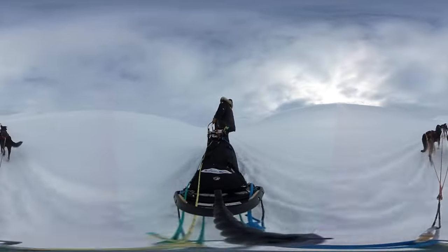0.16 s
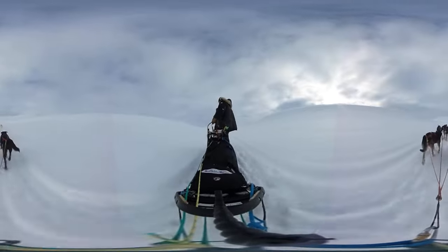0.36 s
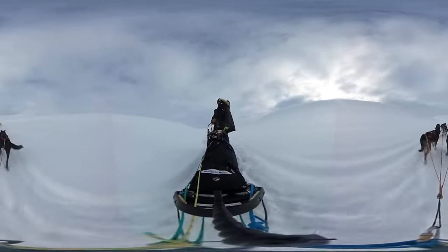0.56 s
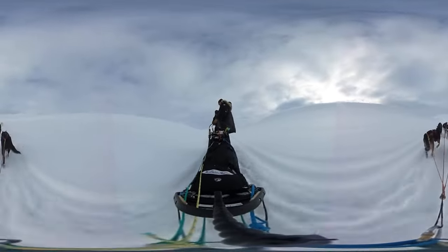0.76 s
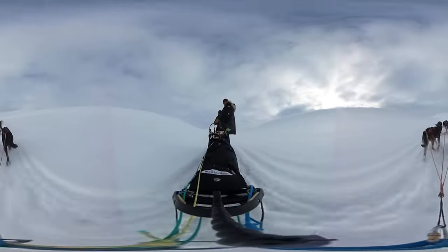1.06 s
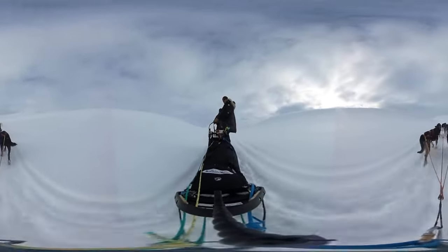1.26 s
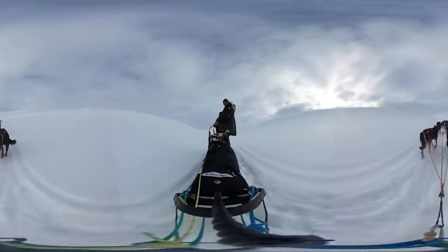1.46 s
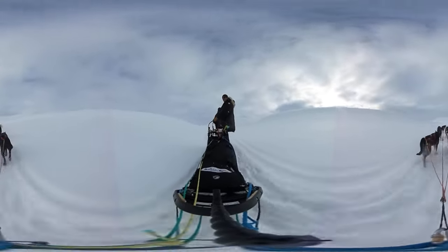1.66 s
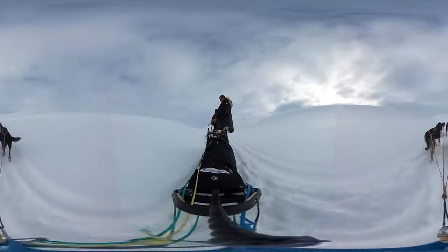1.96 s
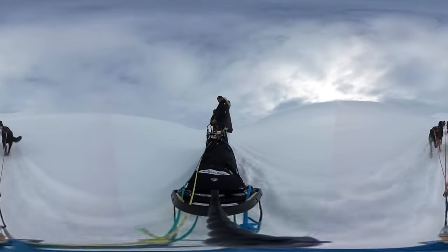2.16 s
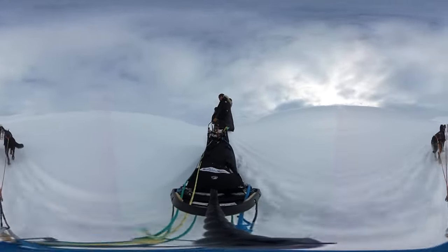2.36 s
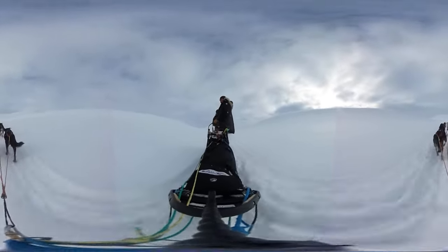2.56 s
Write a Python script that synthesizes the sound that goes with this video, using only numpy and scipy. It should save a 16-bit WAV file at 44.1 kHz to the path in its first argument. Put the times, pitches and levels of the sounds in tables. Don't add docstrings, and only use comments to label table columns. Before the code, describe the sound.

A sled jolts and crunches over crusted snow, its frame knocking amid icy snaps and faint wind.

```python
import sys
import numpy as np
from scipy import signal
from scipy.fft import rfft, irfft
from scipy.io import wavfile
from scipy.ndimage import uniform_filter1d

SR = 44100
rng = np.random.default_rng(int(sys.argv[2]) if len(sys.argv) > 2 else 0)


def to_linear_factor(level_db):
    exponent = np.asarray(level_db, float) / 20
    return 10 ** exponent


def materialize(psi):
    bounded = np.clip(np.atleast_2d(psi).T, -1, 1)
    quanta = np.round(bounded * 32767).astype(np.int16)
    wavfile.write(sys.argv[1], SR, quanta)


N = 120393
T = np.arange(N) / SR


def rms_one(x):
    return x / np.sqrt(np.mean(x ** 2) + 1e-20)


def curve(rows, axis=1):
    rows = np.array(rows)
    return np.interp(T, rows[:, 0], rows[:, axis])


def drift(rate_hz):
    r = np.exp(-16 * np.pi * rate_hz / SR)
    noise = rng.standard_normal(N // 8 + 3002)
    slow = signal.lfilter([1], [1, -2 * r, r * r], noise)[3000:]
    return np.interp(np.arange(N) / 8, np.arange(len(slow)), rms_one(slow))


def resonate(x, hz, width_hz):
    r = np.exp(-np.pi * width_hz / SR)
    feedback = [1, -2 * r * np.cos(2 * np.pi * hz / SR), r * r]
    return signal.lfilter([(1 - r * r) / 2, 0, (r * r - 1) / 2], feedback, x)


def ring(clicks, modes):
    out = 0
    for hz, db, t60 in modes:
        r = to_linear_factor(-60 / (t60 * SR))
        w = 2 * np.pi * hz / SR
        hits = clicks * to_linear_factor(2.5 * drift(150)) + 1e-18
        out = out + signal.lfilter([0, to_linear_factor(db) * np.sin(w)], [1, -2 * r * np.cos(w), r * r], hits)
    return signal.sosfilt(signal.butter(4, 1800, "high", fs=SR, output="sos"), out)


def banded(spectrum, patchy_db, rate_hz, count):
    hz, db = np.transpose(spectrum)
    edges = np.geomspace(hz[0], hz[-1], count + 1)
    white = rng.standard_normal((2, N))
    shared = drift(rate_hz)
    out = 0
    for k, (low, high) in enumerate(zip(edges, edges[1:])):
        band = signal.sosfilt(signal.butter(2, [low, high], "band", fs=SR, output="sos"), white[k % 2])
        level_db = np.interp(np.log(low * high) / 2, np.log(hz), db)
        flicker_db = patchy_db * (0.12 * shared + 1.5 * drift(rate_hz / 2))
        out = out + band * to_linear_factor(level_db + flicker_db)
    return rms_one(out)


# start_s, level_db, graininess_db
RUNNER_LOAD = [(0, -28, 5), (.12, -20, 0), (.36, -17, 2), (.55, -20.5, -3), (.7, -18.5, 7), (.82, -26, 13),
               (.92, -15.5, -8), (1.08, -24, -1), (1.2, -20.5, 5.5), (1.6, -18.5, 1), (1.9, -17, -0.5),
               (2.2, -16.5, 5), (2.5, -16.5, 4), (2.73, -22, 8)]


def runner_load():
    load_db = curve(RUNNER_LOAD)
    return load_db, load_db + curve(RUNNER_LOAD, axis=2)


# pitch_hz, level_db (per Hz)
WIND_SPECTRUM = [(20, -9), (45, 2.5), (150, -6.5), (290, -7)]
# start_s, level_db
GUSTS = [
    (0.0, -29.5),
    (0.15, -29),
    (0.56, -32),
    (0.81, -34),
    (0.82, -36),
    (1.57, -32.5),
    (1.69, -41.5),
    (1.97, -30.5),
    (2.41, -28),
    (2.73, -29),
]


def wind():
    return to_linear_factor(curve(GUSTS) + 3.0) * banded(WIND_SPECTRUM, patchy_db=2.0, rate_hz=9.0, count=7)


# pitch_hz, level_db (per Hz)
HISS_SPECTRUM = [(2800, -10), (4000, -7.5), (6200, -14.5), (7700, -9), (8900, -21.5), (11300, -4.5),
                 (12400, -7)]


def runner_hiss(bright_load, crush, shake, grind, spray):
    rubbing = to_linear_factor(-35) * (bright_load + 0.5 * crush + 0.15 * shake)
    level = rubbing + to_linear_factor(-29) * grind + spray
    return level * banded(HISS_SPECTRUM, patchy_db=3.1, rate_hz=28, count=12)


# pitch_hz, level_db, fade_s (time to fall 60 dB)
KNOCK_TONES = [(2416, 9.5, 0.004), (2870, -16, 0.011)]
# pitch_hz, level_db, fade_s (time to fall 60 dB)
TICK_TONES = [(4970, -9, 0.0013), (6500, -14, 0.003), (7700, -6.5, 0.0029), (10560, -2, 0.0023),
              (11490, -4.5, 0.0042)]


def grains(bright_load_db):
    grains_per_s, spread_db, level_db = 200, 5.5, -27.5
    sizes = to_linear_factor(spread_db * np.minimum(rng.exponential(1, (2, N)), 3))
    sizes = sizes * rng.choice([-1, 1], (2, N))
    born = rng.random(N) < grains_per_s * to_linear_factor(5 * drift(20)) / SR
    ticks = ring(sizes[0] * born, TICK_TONES)
    knocks = ring(sizes[1] * born, KNOCK_TONES)
    return to_linear_factor(bright_load_db + level_db) * rms_one(ticks + 0.24 * knocks)


# pitch_hz, width_hz, level_db
FRAME_TONES = [(404, 103.8, 6), (684.6, 101, -3.5), (809, 142, -8), (917, 496, -7.5), (1334, 354, -13.5),
               (1490, 610, -19), (2252, 550, -17), (2660, 1530, -33.5)]


def frame(load, rattle, shake, grind):
    grit_db, grit_hz = 2.2, 60
    lumps_hz, lumpy_db = 26.6, 1.0
    white = rng.standard_normal((2, N)) * to_linear_factor(grit_db * drift(grit_hz))
    lumps = drift(lumps_hz)
    modes = []
    for k, (hz, width, db) in enumerate(FRAME_TONES):
        tone = rms_one(resonate(resonate(white[k % 2], hz, width), hz, 2 * width))
        level = to_linear_factor(db + lumpy_db * (lumps + drift(9.8)))
        modes.append(level * tone * np.sqrt(width / FRAME_TONES[0][1]))

    power = modes[0] ** 2
    lowest = modes[0] / np.sqrt(1 + uniform_filter1d(power, size=220) / np.mean(power))
    out = 0.89 * lowest * load ** 3 / (load + shake) ** 2
    for k, mode in enumerate(modes[1:]):
        out = out + mode * (0.85 * load + rattle + grind * to_linear_factor(1.5 * k))
    return out


# start_s, level_db (of the bright tick), knock_db (relative to the tick)
HARD_SNAPS = [(0.0687, -21, -19), (0.2128, -0.5, -5.5), (0.377, -11, 0.5), (0.5832, -13, -11),
              (0.6402, -6.5, 2.5), (0.7585, -7.5, -1.5), (0.852, -16, 1), (1.011, 2, -9),
              (1.2472, -13, -15), (1.3779, -28, 20), (1.4276, -16.5, 3), (1.5601, -12.5, -2),
              (1.6367, -5.5, -4.5), (1.6652, -9.5, 0.5), (1.734, -10.5, -6), (1.9763, -16.5, 0),
              (2.0097, -12.5, -4), (2.0697, -3.5, -2), (2.1347, -18, 2.5), (2.4242, -5, -6.5),
              (2.603, -47, -2), (2.618, -10, -1), (2.6771, -20, -3), (2.7177, -21.5, 5)]
# start_s, level_db
ICE_CRACKS = [(0.139, -18), (0.204, -16), (0.312, -16.5), (0.5265, -15.5), (0.9294, -19.5), (1.1208, -18),
              (1.1815, -15), (1.1977, -18.5), (1.5027, -21), (1.5187, -12.5), (1.7677, -12), (1.794, -16),
              (1.8294, -15), (2.0762, -9), (2.091, -16), (1.984, -20), (2.056, -22)]


def snaps():
    bounce_s, bounce_db = 0.003125, -9
    spray_s, spray_db = 0.02, -26
    tick, knock, spray = np.zeros(N), np.zeros(N), np.zeros(N)
    for s, db, knock_db in HARD_SNAPS + [(s, db, -1.5) for s, db in ICE_CRACKS]:
        tick[int((s + 0.0008) * SR)] = to_linear_factor(db)
        knock[int((s + 0.0010) * SR)] = to_linear_factor(db + knock_db)
        knock[int((s + bounce_s) * SR)] = -to_linear_factor(db + np.minimum(knock_db, 0) + bounce_db)
        fade_s = np.where(T > s, spray_s, 0.5 * spray_s)
        spray += to_linear_factor(db + spray_db) * np.exp(-np.abs(T - s) / fade_s)
    return ring(tick, TICK_TONES) + ring(knock, KNOCK_TONES), spray


# centre_s, length_s, level_db
GRINDING_BURSTS = [(0.13, 0.009, -39), (0.305, .03, -15), (0.356, 0.04, -21), (.565, 0.0041, -15),
                   (.586, 0.0064, 2.5), (0.628, 0.047, -18.5), (0.682, 0.0074, -31), (0.857, 0.0096, -15.5),
                   (0.985, 0.016, -22.5), (1.2, 0.023, -22.5), (1.246, 0.01, -9), (1.279, 0.021, -15),
                   (1.348, 0.017, -27), (1.381, .012, -11), (1.449, 0.016, -3.5), (1.512, 0.072, -17),
                   (1.563, 0.017, -12), (1.591, 0.021, -25), (1.682, 0.0066, -13), (1.749, 0.0075, -10.5),
                   (1.962, 0.016, -28), (2.013, .024, -15.5), (2.099, 0.031, -19), (2.179, 0.029, -13.5),
                   (2.227, 0.013, -28), (2.285, 0.013, -18.5), (2.415, 0.018, -24), (2.497, 0.054, -12),
                   (2.634, 0.03, -21), (2.724, .011, -8.5)]


def scrapes():
    out = np.zeros(N)
    for s, length, db in GRINDING_BURSTS:
        out += to_linear_factor(db) * np.exp(-(2.04 * (T - s) / length) ** 2)
    return out


# start_s, level_db, pitch_hz
CRUST_BREAKS = [(0.146, 0, 677), (0.292, -21, 1230), (0.56, -11, 710), (0.584, 6, 1070), (0.63, 2, 930),
                (0.852, -2, 800), (1.156, 0.5, 667), (1.241, -1, 623), (0.942, -12, 740), (1.333, 2.5, 883),
                (1.389, -3, 790), (1.603, 1, 740), (1.966, 6, 650), (2.27, 3, 737), (2.493, -10, 706),
                (1.443, 9.5, 785), (1.563, 6, 773), (1.589, 0, 704), (1.744, 1, 677), (1.848, 6, 897),
                (2.009, 8.5, 777), (2.112, -20, 670), (2.172, 6, 718), (2.524, -1, 968), (2.614, 6.5, 920),
                (2.722, 2.5, 714)]


def crunches():
    rise_s, fall_s, level_db = 0.0037, 0.0054, -10
    out, crush = np.zeros(N), np.zeros(N)
    for s, db, hz in CRUST_BREAKS:
        t = np.clip(T - s, 0, 1)
        rise = 1 - np.exp(-(t / rise_s) ** 2)
        fall = np.exp(-(t / (rise_s + fall_s)) ** 2)
        shape = to_linear_factor(db) * rise * fall
        out += shape * np.sin(2 * np.pi * hz * t)
        crush += shape
    return to_linear_factor(level_db) * out, crush


# centre_s, length_s, level_db, pitch_hz
FRAME_JOLTS = [(0.259, 0.007, -12.0, 449.0), (0.296, 0.012, -6.0, 396.0), (0.367, 0.007, -12.0, 410.0),
               (0.586, 0.014, -7.0, 403.0), (0.609, 0.01, -4.0, 371.0), (0.859, 0.016, -9.0, 396.0),
               (0.942, 0.009, -12.0, 419.0), (0.988, 0.018, -6.0, 411.0), (1.131, 0.008, -12.0, 395.0),
               (1.243, 0.009, -6.0, 398.0), (1.324, 0.01, -8.0, 399.0), (1.394, 0.006, -9.0, 419.0),
               (1.423, 0.007, -6.0, 420.0), (1.436, 0.009, -9.0, 423.0), (1.451, 0.01, -9.0, 407.0),
               (1.486, 0.007, -12.0, 404.0), (1.504, 0.01, -9.0, 412.0), (1.535, 0.012, -4.0, 411.0),
               (1.558, 0.007, -6.0, 409.0), (1.595, 0.009, -10.0, 409.0), (1.609, 0.007, -11.0, 374.0),
               (1.685, 0.008, -9.0, 399.0), (1.704, 0.009, -12.0, 416.0), (1.748, 0.014, -13.0, 398.0),
               (1.803, 0.01, -12.0, 398.0), (1.824, 0.016, -9.0, 428.0), (1.855, 0.019, -10.0, 408.0),
               (1.918, 0.006, -6.0, 396.0), (1.938, 0.006, -9.0, 421.0), (1.956, 0.007, -8.0, 434.0),
               (1.986, 0.006, -9.0, 400.0), (2.006, 0.009, -3.0, 408.0), (2.021, 0.011, -11.0, 378.0),
               (2.067, 0.008, -11.0, 445.0), (2.114, 0.008, -8.0, 415.0), (2.14, 0.006, -10.0, 398.0),
               (2.169, 0.006, -9.0, 382.0), (2.191, 0.007, -10.0, 428.0), (2.238, 0.008, -12.0, 390.0),
               (2.279, 0.019, -7.0, 386.0), (2.312, 0.019, -5.0, 384.0), (2.348, 0.018, -9.0, 404.0),
               (2.373, 0.015, -7.0, 395.0), (2.405, 0.019, -5.0, 376.0), (2.419, 0.014, -3.0, 413.0),
               (2.436, 0.012, -12.0, 428.0), (2.487, 0.043, -8.0, 404.0), (2.531, 0.011, -12.0, 410.0),
               (2.623, 0.013, -11.0, 404.0), (2.726, 0.007, -13.0, 448.0)]
# centre_s, length_s, level_db, pitch_hz
MORE_JOLTS = [
    (0.596, 0.0088, -8.5, 340),
    (0.69, 0.018, -15, 429),
    (0.784, 0.0096, -16, 332),
]


def jolts():
    octave_db, trim_db = -10, 1.2
    pitch_wander, squareness = 0.015, 1.15
    out, shake = np.zeros(N), np.zeros(N)
    wander = np.cumsum(drift(63.3)) / SR
    for s, length, db, hz in FRAME_JOLTS + MORE_JOLTS:
        swell = np.clip(0.5 + squareness * (0.5 - np.abs(T - s) / length), 0, 1)
        shape = to_linear_factor(db + trim_db) * np.sin(np.pi / 2 * swell) ** 2
        phase = 2 * np.pi * hz * (T - s + pitch_wander * wander)
        out += shape * (np.sin(phase) + to_linear_factor(octave_db) * np.sin(2 * phase + 1))
        shake += shape
    return out, shake


def thump():
    centre_s, length_s, level_db, pitch_hz = 0.777, 0.0045, -11, 230
    t = T - centre_s
    swell = np.exp(-(t / length_s) ** 2)
    return -to_linear_factor(level_db) * swell * np.cos(2 * np.pi * pitch_hz * t * (1 + 45 * t))


def scene():
    load_db, bright_load_db = runner_load()
    swing, shake = jolts()
    crunch, crush = crunches()
    snap, spray = snaps()
    grind = scrapes()
    rattle = to_linear_factor(-35) * shake + to_linear_factor(-30) * crush
    mix = wind() + runner_hiss(to_linear_factor(bright_load_db), crush, shake, grind, spray)
    mix = mix + grains(bright_load_db)
    mix = mix + frame(to_linear_factor(load_db - 3.5), rattle, shake, to_linear_factor(-9) * grind)
    mix = mix + snap + crunch + swing + thump()
    return mix[None]


def low_pass(x):
    return signal.sosfilt(signal.butter(12, 14800, fs=SR, output="sos"), x)


# start_s, length_s
TREBLE_DROPS = [(0.049, 0.0088), (0.27, 0.0059), (0.557, 0.022), (0.819, 0.027), (0.873, 0.0052),
                (1, 0.011), (1.235, 0.0066), (1.255, 0.0057), (1.39, 0.027), (1.545, 0.0038), (1.65, 0.01),
                (1.706, 0.025), (1.737, 0.0082), (1.989, 0.0082), (2.025, 0.0077), (2.255, 0.022),
                (2.458, 0.0049), (2.585, 0.017), (2.625, 0.01), (2.653, 0.025), (2.685, 0.041)]
DROP_BORDERS = [3400, 4300, 5200, 6200, 7200, 8300, 9400, 10500, 11500, 13000]


def record(dry):
    drop_db, ragged, fade_s = -40, 0.35, 0.002
    cutoff_hz, clip_level = 12600, 0.66
    start, length = np.transpose(TREBLE_DROPS)
    hz = np.fft.rfftfreq(N, 1 / SR)
    spectrum = rfft(dry)
    out = dry.copy()
    for k, (low, high) in enumerate(zip(DROP_BORDERS, DROP_BORDERS[1:])):
        band = irfft(spectrum * ((hz >= low) & (hz < high)), N)
        shorter = (k < 2) * (2 - k) / 2
        trim = ragged * length * (rng.uniform(-0.5, 1, (2, len(start))) + shorter)
        since_start = T[:, None] - start - trim[0]
        until_end = start + length - trim[1] - T[:, None]
        gate = np.clip(np.minimum(since_start, until_end) / fade_s + 1, 0, 1).max(1)
        out = out - band * gate * (1 - to_linear_factor(drop_db))
    out = signal.sosfilt(signal.cheby2(16, 70, cutoff_hz, fs=SR, output="sos"), out)
    out = out / (1 + np.abs(out / clip_level) ** 20) ** (1 / 20)
    shelf_db = -11 * np.clip((hz - cutoff_hz) / 700 + 1, 0, 1)
    slope_db = -5 * np.clip(hz - cutoff_hz, 0, None) / 1000
    out = irfft(rfft(out) * to_linear_factor(shelf_db + slope_db), N)
    return low_pass(out)


dry = scene()
out = record(dry)
materialize(out)
```